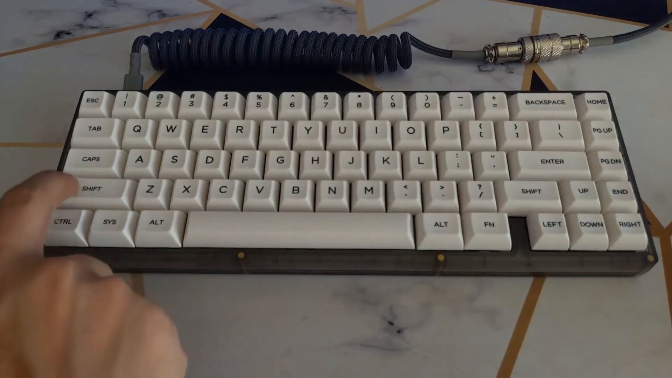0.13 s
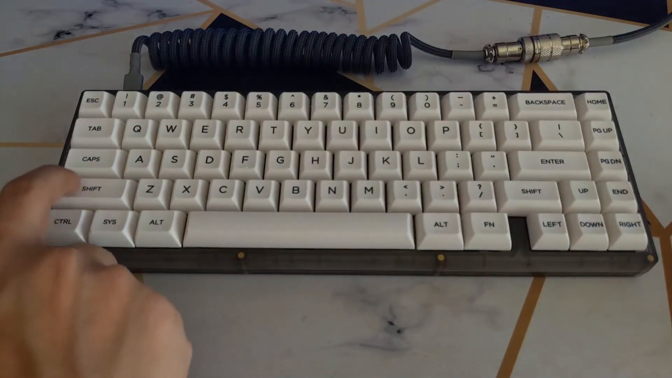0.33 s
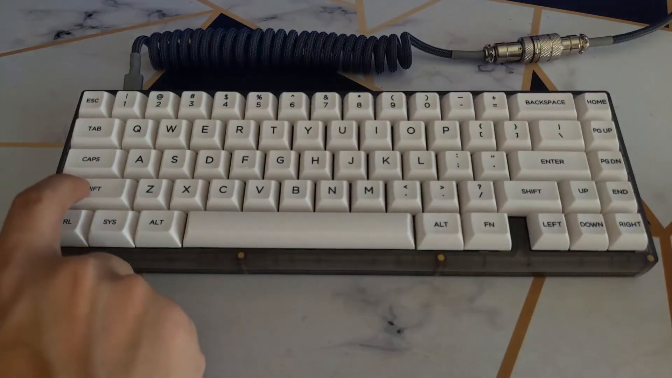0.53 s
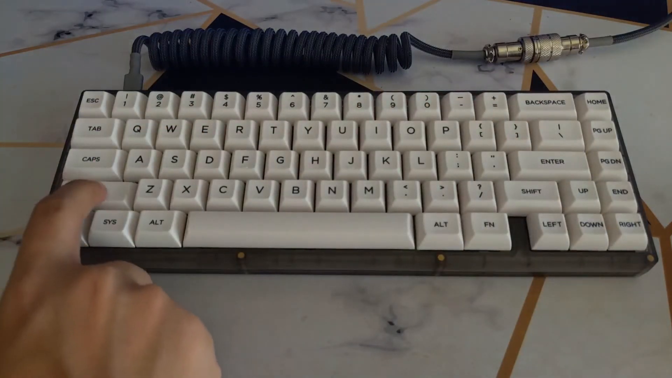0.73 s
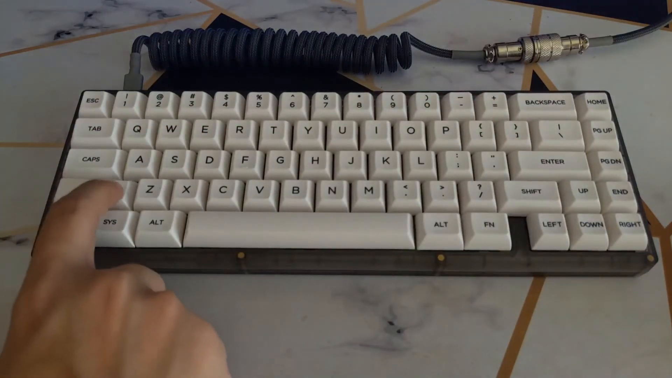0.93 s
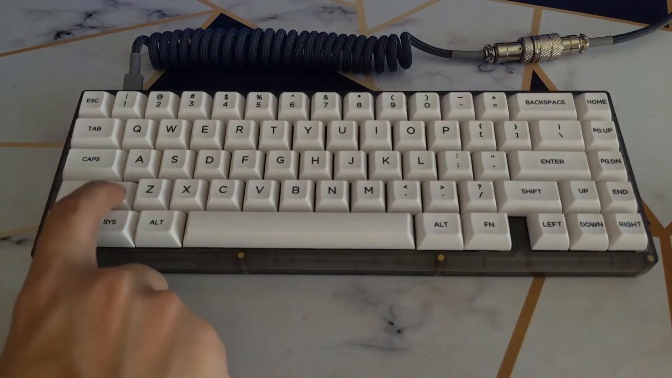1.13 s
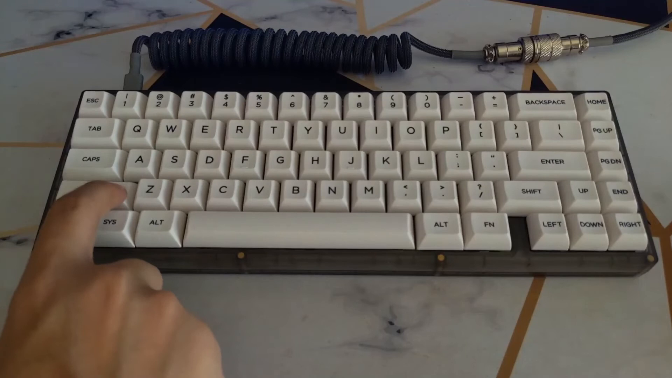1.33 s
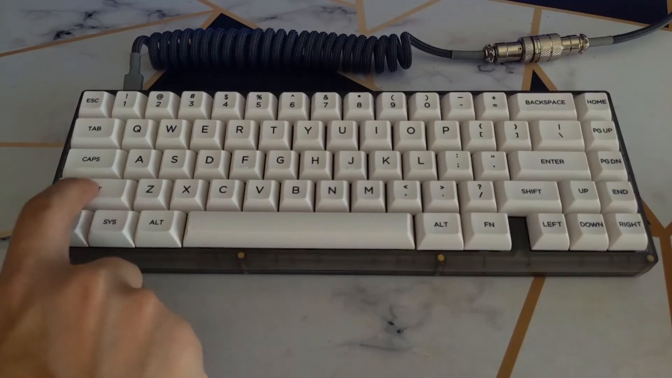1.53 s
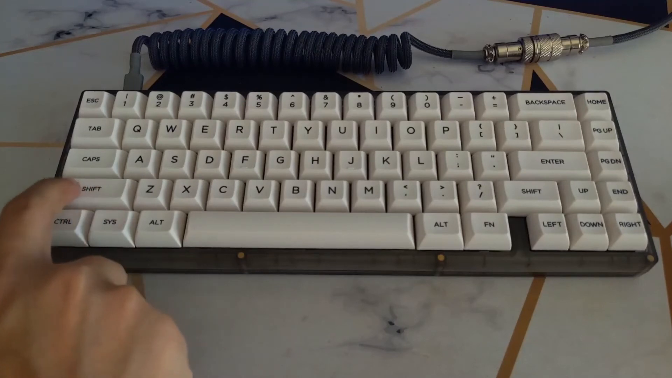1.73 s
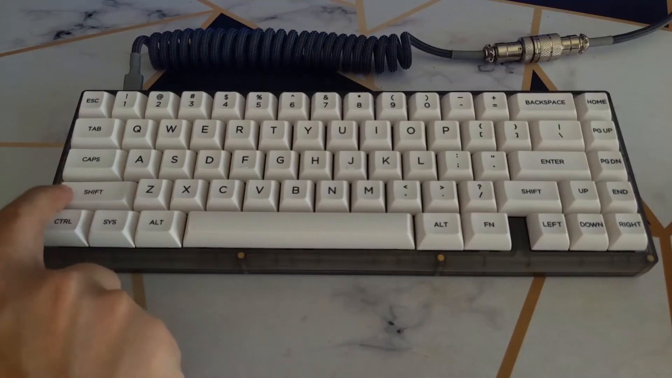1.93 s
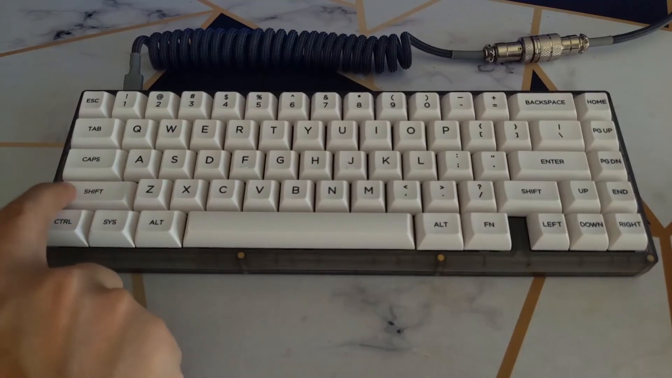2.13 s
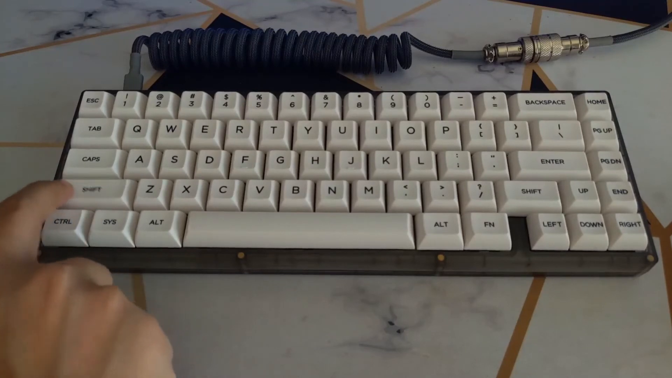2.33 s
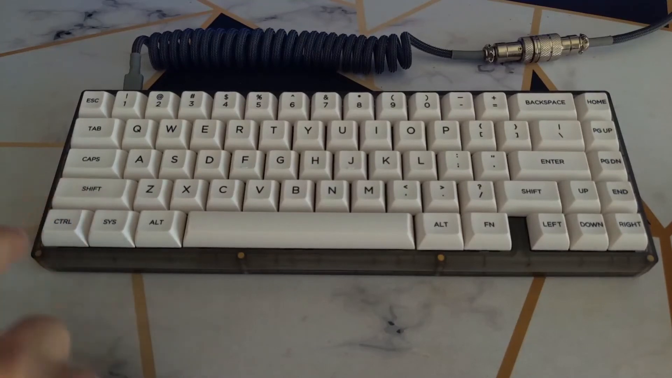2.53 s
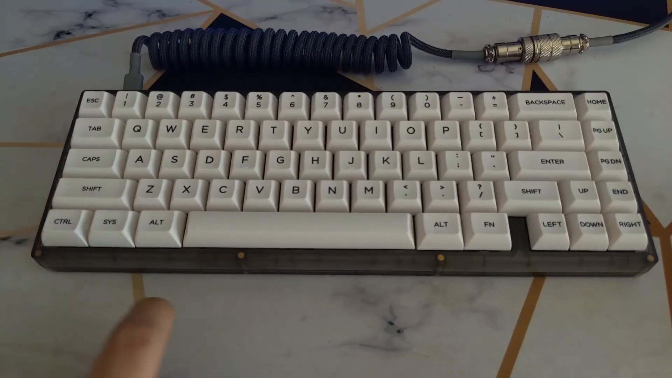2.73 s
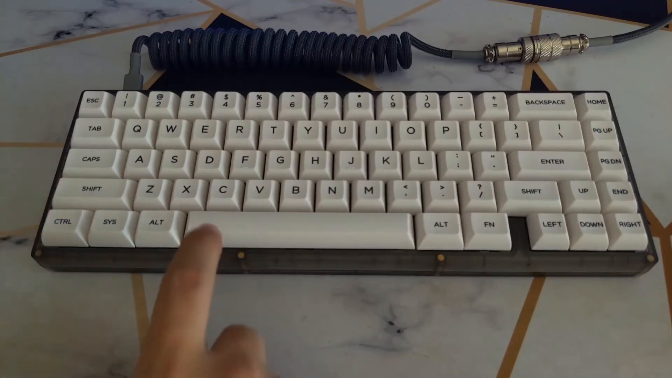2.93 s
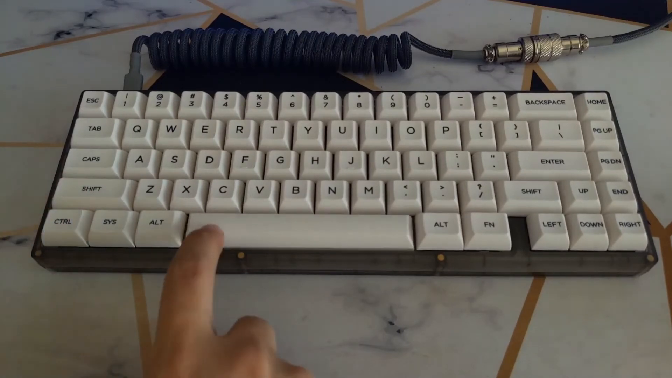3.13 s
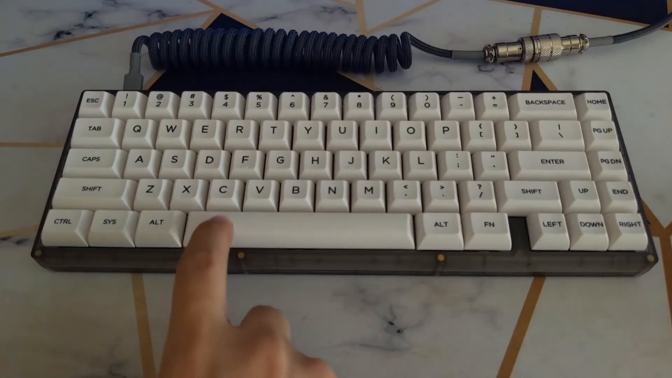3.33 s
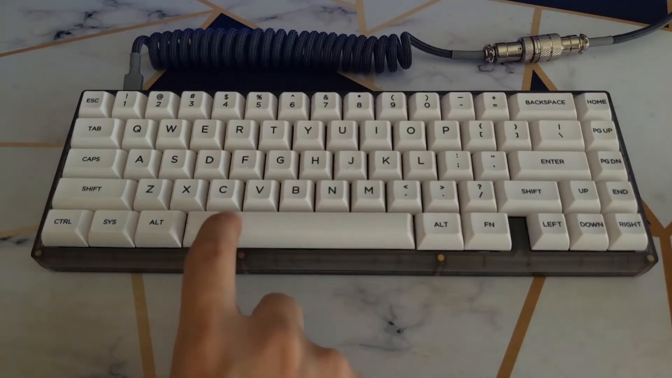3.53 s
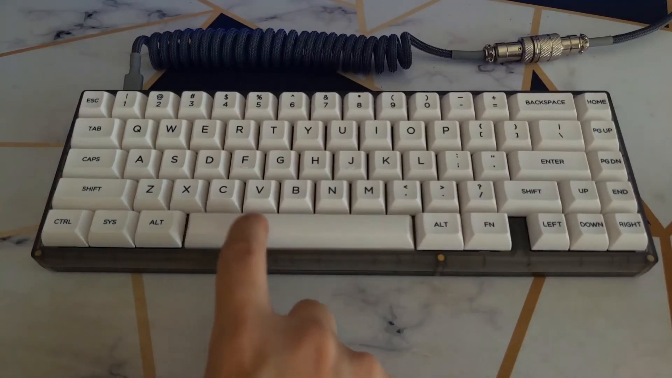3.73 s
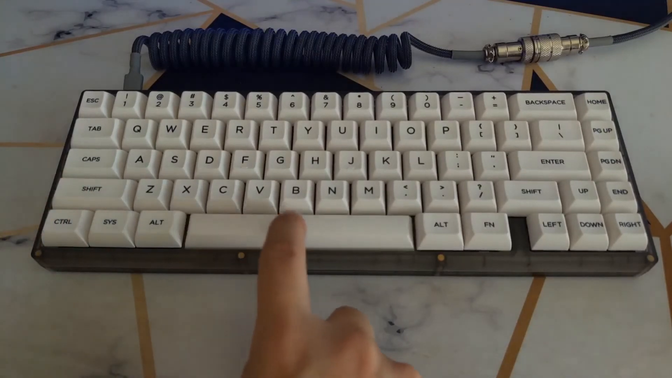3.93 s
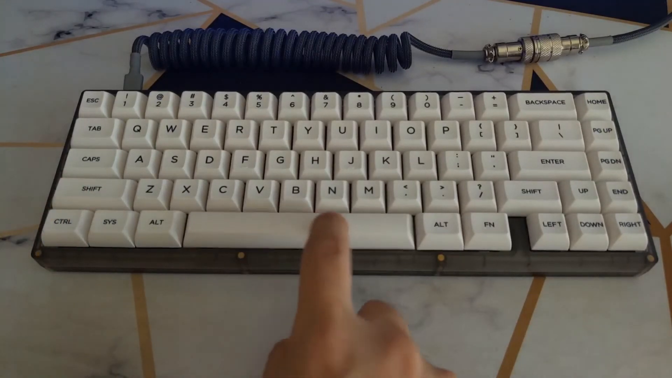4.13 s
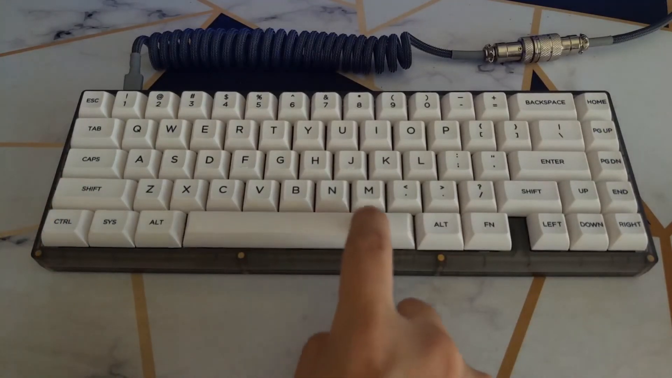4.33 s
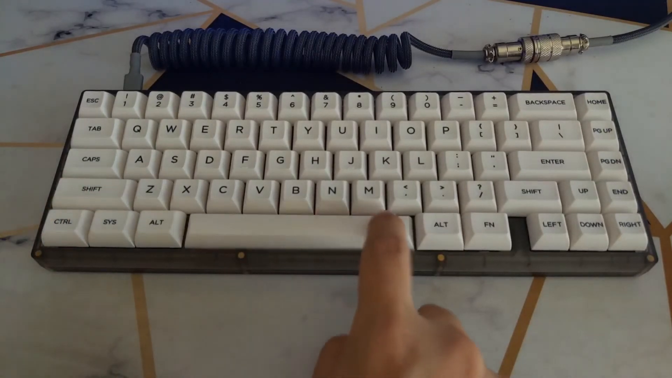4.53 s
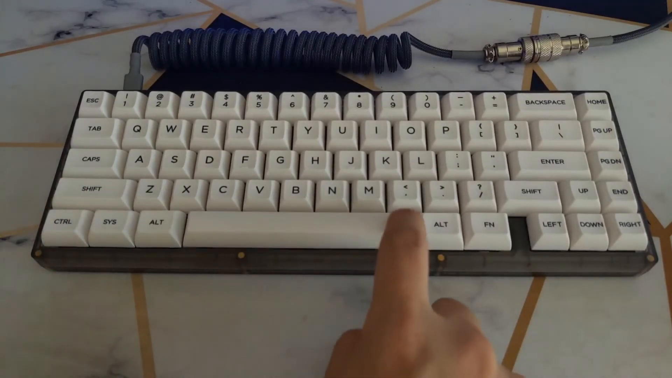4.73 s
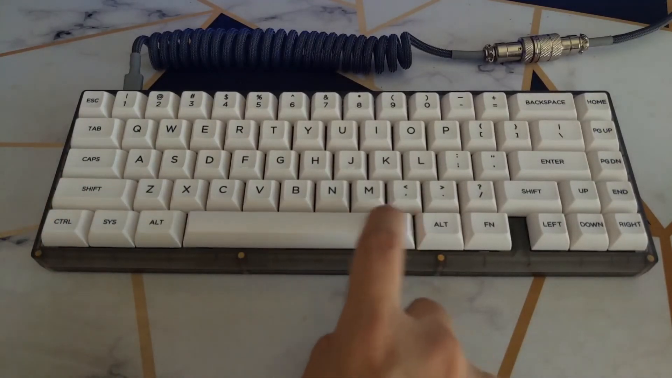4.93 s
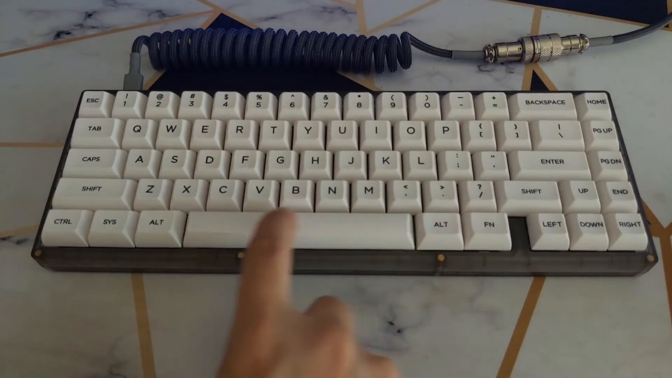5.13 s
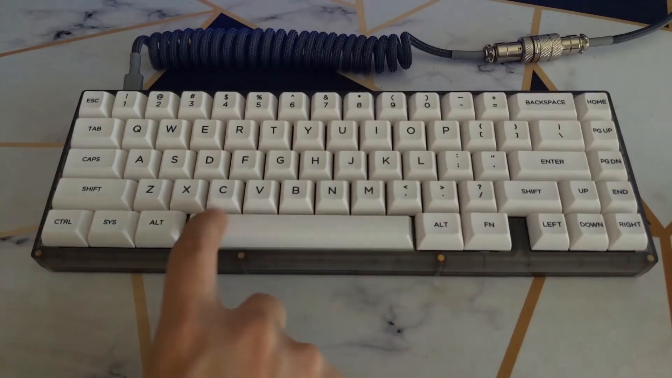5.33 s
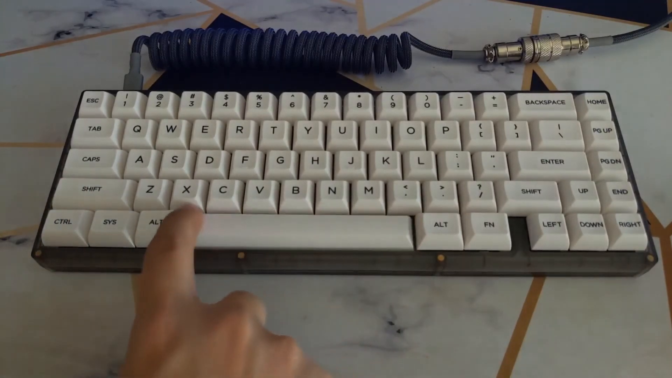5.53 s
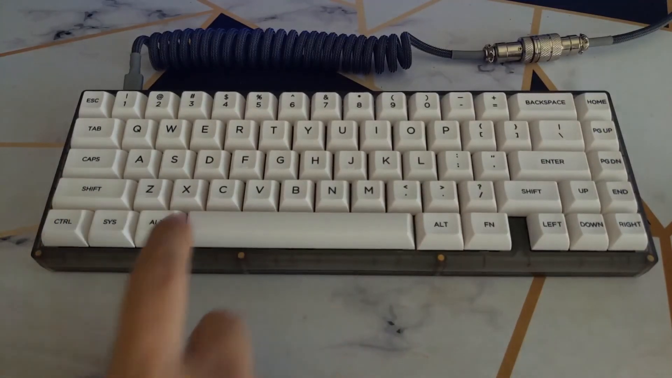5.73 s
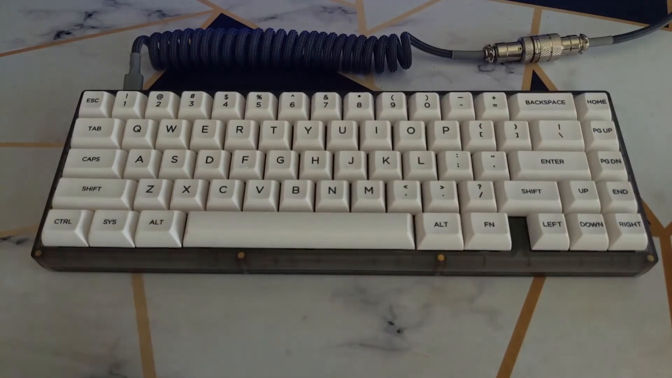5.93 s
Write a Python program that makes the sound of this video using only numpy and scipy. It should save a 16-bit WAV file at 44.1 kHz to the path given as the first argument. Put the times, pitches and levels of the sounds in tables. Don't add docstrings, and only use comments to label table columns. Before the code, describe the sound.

Two bursts of mechanical keyboard tapping, recorded close on the same desk. First a brisk run on a wide key, bright and clicky with loose rattling; then a quiet gap; then a longer run along the space bar, deeper, rounder and thockier, with uneven strength. Short indoor reflections follow the strokes, while the desk gives a very low, subdued boom and sway.

```python
import sys
import numpy as np
from scipy import signal
from scipy.fft import rfft, irfft
from scipy.io import wavfile
from scipy.ndimage import uniform_filter1d

SR = 44100
rng = np.random.default_rng(int(sys.argv[2]) if len(sys.argv) > 2 else 0)


def dump(signal):
    limited = np.clip(np.atleast_2d(signal).T, -1, 1)
    pcm = np.round(limited * 32767).astype(np.int16)
    wavfile.write(sys.argv[1], SR, pcm)


def ratio_of_db(decibels):
    return 10 ** (np.asarray(decibels, float) / 20)


N = 267687
LEAD_SAMPLES = 800


def read(points, hz):
    f_hz, value = np.transpose(points)
    return np.interp(np.log(hz + 1), np.log(f_hz + 1), value)


def add(mix, s, sound):
    part = mix[round(s * SR):][:len(sound)]
    part += sound[:len(part)]


def ring(modes, t, luck, spread_db, rise_s, tilt_db=0):
    hz, width_hz, db = np.transpose(modes)[:, :, None]
    count = len(hz)
    db = db + spread_db * luck[:count, :1] - tilt_db * np.log2(hz / 1800)
    sign = (-1.) ** np.arange(count)[:, None]
    mode_hz = hz * (1 + .011 * luck[:count, 1, None])
    decay = np.exp(-np.pi * width_hz * t)
    waves = sign * ratio_of_db(db) * decay * np.sin(2 * np.pi * mode_hz * t)
    return waves.sum(0) * (1 - np.exp(-(t / rise_s) ** 2))


def stroke(peak_db, treble_db, low_db, thud_db, rattle_db, body, tick, knock, luck):
    t = np.arange(LEAD_SAMPLES) / SR
    heights = luck[:24]
    scrape, chatter = luck[100:100 + LEAD_SAMPLES, :2].T
    gap_luck, size_luck = luck[30:34].T[:2]

    blows = np.zeros(2 * LEAD_SAMPLES)
    blows[:LEAD_SAMPLES] = ratio_of_db(-39.0) * scrape * (t / t[-1]) ** 4.5
    blows[LEAD_SAMPLES] = 1
    lone_blow = blows * (np.arange(2 * LEAD_SAMPLES) == LEAD_SAMPLES)
    gaps_s = np.array([.0014, .0029, .0055, .009]) * np.exp(.25 * gap_luck)
    bounce_db = rattle_db - 5.0 * np.arange(len(gaps_s)) + 3.9 * size_luck
    bounce_at = LEAD_SAMPLES + np.minimum(gaps_s * SR, LEAD_SAMPLES - 1).astype(int)
    blows[bounce_at] += ratio_of_db(bounce_db) * np.sign(gap_luck * size_luck)

    contact = np.exp(-((t - .0004) / .00006) ** 2)
    edge = np.exp(-((t - .0005) / .000013) ** 2)
    gritty_edge = edge + 0.11 * chatter * (t / 0.0016) * np.exp(-t / 0.0018)
    dullness_db = 0.66 * (-19.5 - treble_db)

    out = []
    for train, grit, blur in ((blows, gritty_edge, 1), (lone_blow, edge, 1.6)):
        body_ring = ring(np.multiply(body, [1, blur, 1]), t, heights, 1.0, 0.00025, low_db)
        tick_ring = ring(np.multiply(tick, [1, blur, 1]), t, heights[::-1], 6.1, 0.00023, dullness_db)
        thock = signal.fftconvolve(np.convolve(body_ring, contact), train)
        click = signal.fftconvolve(np.convolve(tick_ring, np.gradient(grit)), train)
        thock /= abs(thock).max()
        click /= abs(click).max()
        out.append(ratio_of_db(peak_db - 2.0) * (thock + ratio_of_db(treble_db) * click))

    thump = ratio_of_db(thud_db + 7.5) * ring(knock, np.arange(2 * LEAD_SAMPLES) / SR, heights[::-2], 1.4, 0.0051)
    fade = np.cos(np.linspace(0, np.pi / 2, 2 * LEAD_SAMPLES))
    add(out[0], LEAD_SAMPLES / SR, thump * fade)
    return out


def keys():
    # [t/s, blow peak/dB, treble share/dB, rattle/dB]
    wide_strokes = [(.205, -25.5, -18.5, -8), (.284, -30, -17.5, -1.5), (.381, -23, -13, -11.5),
                    (.457, -30.5, -21.5, -1), (.545, -27.5, -21.5, -8), (.609, -26.5, -16.5, 12),
                    (.705, -28.5, -19.5, -14), (.775, -34.5, -17.5, 0), (.934, -26, -21, -9),
                    (1.023, -35.5, -28.5, 14), (1.094, -23, -15.5, -19), (1.194, -36.5, -53.5, -9),
                    (1.261, -21.5, -17, -16), (1.344, -30.5, -6.5, 6), (1.418, -22.5, -14.5, -14.5),
                    (1.504, -30, -23, -1), (1.59, -27.5, -17.5, -13), (1.672, -30, -22.5, -2.5),
                    (1.744, -22.5, -15, -11), (1.828, -28, -27, 6), (1.911, -23.5, -23, -7),
                    (1.991, -24, -11.5, -7.5), (2.082, -22, -18, -12), (2.326, -30.5, -19, -3)]
    bar_strokes = [(3.134, -42, -62.5, -2.5), (3.272, -31.5, -24.5, -34), (3.325, -30.5, -18, -12),
                   (3.421, -25.5, -13.5, -17.5), (3.5, -33.5, -18, -17), (3.57, -26, -14.5, -15),
                   (3.653, -34, -14.5, -10), (3.729, -27.5, -16.5, -8.5), (3.816, -34, -19, -13),
                   (3.89, -27.5, -19, -15.5), (3.998, -34, -32, -41), (4.059, -27.5, -21, -12),
                   (4.129, -32, -23.5, -10), (4.225, -27.5, -15.5, -23), (4.294, -33, -28.5, -6),
                   (4.402, -33, -62, -23.5), (4.546, -28, -21, -12.5), (4.627, -25, -15.5, -9.5),
                   (4.716, -30, -29.5, -32), (4.791, -26, -15, -13), (4.888, -28.5, -29.5, -26),
                   (4.967, -25, -12.5, -12), (5.056, -33.5, -28, -5), (5.146, -28, -17.5, -9),
                   (5.243, -29, -23, -22), (5.318, -23, -14, -17.5), (5.408, -32.5, -22.5, -8),
                   (5.48, -23.5, -13.5, -19), (5.562, -28.5, -18, -7)]
    wide_ticks = [(.173, -41.5, -34, -7), (.3535, -36, -36, -21), (.507, -41, -41, -13),
                  (.594, -39, -35.5, 12), (1.066, -52.5, -30.5, -12), (1.2344, -49.5, -30, -23),
                  (1.49, -46, -34.5, -4), (1.5439, -41, -36, -14.5), (1.72, -36.5, -26.5, -8),
                  (1.8897, -37, -34, 12), (2.0712, -35, -29, -6.5)]
    bar_ticks = [(4.5134, -69, -33, 5), (4.6043, -49, -38.5, -7.5), (4.692, -55, -36, -11),
                 (4.761, -48, -28.5, -8.5), (4.947, -59.5, -30, -5), (5.3014, -46, -29, -11.5),
                 (5.459, -43.5, -33, -17), (5.571, -43, -21.5, -4), (5.648, -61, -41, -18)]
    # [f/Hz, width/Hz, level/dB]
    wide_down_body = [(896, 150, -13.5), (1448, 240, -5.5), (1970, 230, 2.5), (2497, 210, 1.5),
                      (3170, 136, 0.5), (4065, 660, 1.8), (4850, 280, -3.5)]
    wide_up_body = [(893, 90, -17.5), (1453, 110, -13.5), (1847, 87, -8), (2137, 170, -2), (2487, 200, 4.5),
                    (3223, 177, 2.35), (4240, 420, -9.5), (4905, 140, -12)]
    wide_loose_body = [(1700, 350, -7.5), (1970, 300, 2.5), (2490, 380, 3.5), (2870, 320, 3),
                       (3000, 260, -13.5), (4600, 250, -16.5)]
    wide_tick = [(4100, 670, 8), (5020, 1200, 5.5), (5600, 430, 0), (6900, 350, -0.5), (7740, 660, -5.5),
                 (8820, 510, -3), (9820, 450, -10.5), (10730, 900, -8.5), (12850, 910, -6)]
    bar_down_body = [(873, 97, -16), (1120, 130.4, -5), (1372, 184, 0.5), (1801, 128, -1), (2562, 210, 1),
                     (3537, 274, 1), (4250, 360, -13.5), (4510, 71, -17)]
    bar_up_body = [(864, 160, -22.5), (1109, 191, -6), (1356, 170, -3.5), (1800, 124, 0.5),
                   (2528, 213, 3.5), (3410, 140, -10.5), (4300, 346, -21.5)]
    bar_loose_body = [(1794, 250, 0.5), (2500, 300, -5.5), (3420, 510, -2.5), (4500, 300, -15.5)]
    bar_tick = [(4310, 380, 5.5), (5290, 370, -19), (5834, 353, 5), (8220, 460, 7), (8216, 540, 4.5),
                (10100, 480, -2), (11100, 210, -35), (12780, 520, -11.5), (15100, 380, -27.5)]
    # [f/Hz, width/Hz, level/dB]
    wide_knock = [(232, 21, -19.5), (378, 28, 1), (485.7, 42, -1)]
    bar_knock = [(212, 63, 2.5), (271.6, 50, 4), (349, 47, -11)]
    # [low-mode share/dB, slope/(dB/dB), desk thud/dB, slope/(dB/dB), leg jolt/dB]
    wide_down_law = (2.2, 0.23, -70, 1.05, -44.5)
    wide_up_law = (2.5, -0.23, -65, 0.56, -53)
    bar_down_law = (2.5, -0.01, -56, 1, -41.5)
    bar_up_law = (4.5, -0.12, -56.5, 0.42, -47.5)
    tick_law = (-2, -0.32, -86, -0.6, -61)
    # [t/s, jolt/dB]
    hand_lands = [
        (2.97, -57),
        (3.128, -47),
    ]

    kinds = (
        (wide_strokes[::2], wide_down_law, wide_down_body, wide_tick, wide_knock),
        (wide_strokes[1::2], wide_up_law, wide_up_body, wide_tick, wide_knock),
        (bar_strokes[1::2], bar_down_law, bar_down_body, bar_tick, bar_knock),
        (bar_strokes[::2], bar_up_law, bar_up_body, bar_tick, bar_knock),
        (wide_ticks, tick_law, wide_loose_body, wide_tick, wide_knock),
        (bar_ticks, tick_law, bar_loose_body, bar_tick, bar_knock))
    usual_blow_db, jolt_per_db = -28, 0.87
    near, far, pushes, jolts = np.zeros((4, N))
    t = np.arange(1000) / SR
    cushion = np.exp(-((t - .001) / 0.00042) ** 2)
    for rows, law, body, tick, knock in kinds:
        low_db, low_slope, thud_db, thud_slope, jolt_db = law
        lucks = rng.standard_normal((len(rows), len(t), 3))
        for (s, peak_db, treble_db, rattle_db), luck in zip(rows, lucks):
            firm_db = peak_db - usual_blow_db
            low = low_db + low_slope * firm_db
            thud = thud_db + thud_slope * firm_db
            direct, spread = stroke(peak_db, treble_db, low, thud, rattle_db, body, tick, knock, luck)
            add(near, s - LEAD_SAMPLES / SR, direct)
            add(far, s - LEAD_SAMPLES / SR, spread)
            shove = luck[:, -1] * np.exp(-t / 0.0043)
            add(pushes, s, ratio_of_db(thud - 54.5) * np.convolve(shove, cushion))
            jolts[round(s * SR)] = ratio_of_db(jolt_db + jolt_per_db * firm_db)
    for s, jolt_db in hand_lands:
        add(jolts, s, ratio_of_db(np.array([jolt_db])))
    return near, far, pushes, jolts


def room(x):
    # [delay/s, level/dB]
    echoes = [(.0058, -23), (.0103, -23.5), (.0139, -25), (.021, -30.5)]
    # [f/Hz, t60/s]
    room_t60 = [(200, 0.23), (700, 0.47), (2000, 0.2), (5000, 0.31), (12000, 0.48)]
    tail_db, turn_hz, onset_s = -8.5, 2.65, 0.0037
    out = np.zeros(N)
    for delay_s, db in echoes:
        add(out, delay_s, ratio_of_db(db) * x)
    turn = 2 * np.pi * turn_hz * np.arange(N) / SR
    for k in range(3):
        hz, t, z = signal.stft(rng.standard_normal(SR // 2), SR, nperseg=128)
        decay = ratio_of_db(-60 * t / read(room_t60, hz)[:, None])
        tail = signal.istft(z * decay, SR, nperseg=128)[1]
        tail *= np.clip(np.arange(len(tail)) / SR / onset_s, 0, 1)
        feed = x * np.cos(turn + k * np.pi / 3) * np.sqrt(2 / 3)
        out += ratio_of_db(tail_db) * signal.oaconvolve(feed, tail / np.linalg.norm(tail))[:N]
    return out


def desk_top(pushes):
    # [f/Hz, level/dB, t60/s]
    desk_modes = [(95.33, -1, 1), (126.8, 2.5, 0.34), (158.7, -11, .3), (224.1, 0.5, 0.28),
                  (248, -6.5, 0.033), (286.3, -1, 0.082), (315, -10.5, .1), (354.5, -1.5, 0.12),
                  (401.4, -13, 0.1), (457, -12, 0.3), (574, -17, 0.24)]
    t = np.arange(SR) / SR
    boom = sum(ratio_of_db(db - 60 * t / t60_s) * np.sin(2 * np.pi * hz * t) for hz, db, t60_s in desk_modes)
    return ratio_of_db(1.5) * signal.oaconvolve(pushes, boom)[:N]


def desk_legs(jolts):
    # [t/s, f/Hz, level/dB]
    sway_track = [(0.0, 23.3, -80), (0.22, 24.8, -46.5), (0.32, 25.1, -54), (0.78, 25.14, -40),
                  (1.08, 24.8, -50), (1.23, 24.74, -45.5), (1.84, 24.77, -55), (2.04, 26.55, -49),
                  (2.13, 25.05, -44), (2.91, 24.54, -56), (3.11, 26.32, -58), (3.5, 26.1, -41),
                  (3.75, 26.24, -53), (3.87, 23.72, -46), (4.18, 23.83, -35), (4.48, 23.4, -33),
                  (5.93, 23.43, -46.5), (6.07, 23.02, -51.5)]
    # [f/Hz, width/Hz, level/dB]
    shudder = [(30.3, 3.7, -4.4), (35.1, 3.4, 0.5), (17, 6, -10.5), (7.6, 1.2, -13)]
    # [f/Hz, width/Hz, level/dB]
    rocking = [(48.39, 0.83, -8), (57, 2.2, -10), (64, 3.3, -18)]
    first_touch_s, wake_s = 0.17, 0.033
    shudder_rise_s, rocking_rise_s = 0.021, .015
    t = np.arange(N) / SR
    s, *columns = np.transpose(sway_track)
    hz, sway_db = (np.interp(t, s, c) for c in columns)
    started = np.clip((t - first_touch_s) / wake_s, .3, 1)
    sway = started * np.sqrt(2) * ratio_of_db(sway_db) * np.sin(2 * np.pi * np.cumsum(hz) / SR)
    ring_t = np.arange(2 * SR) / SR
    even = np.zeros((len(shudder), 2))
    rings = ring(shudder, ring_t, even, 0, shudder_rise_s) + ring(rocking, ring_t, even, 0, rocking_rise_s)
    return sway + signal.oaconvolve(jolts, rings)[:N]


def coloured(points):
    shape = ratio_of_db(read(points, np.fft.rfftfreq(N, 1 / SR)))
    x = irfft(rfft(rng.standard_normal(N)) * shape, N)
    return x / (np.sqrt(uniform_filter1d(x ** 2, size=6000)) + 1e-9)


def murmur(jolts):
    # [f/Hz, level/dB per Hz]
    murmur_colour = [(60, -9), (95, 4), (155, -7.5), (220, -1.5), (320, -9.5), (460, -20.5), (650, -32),
                     (1200, -64)]
    fed_db, t60_s, rise_s, still_db = -26, 2.6, 0.051, -91.5
    t = np.arange(N) / SR
    response = ratio_of_db(fed_db - 60 * t / t60_s) ** 2 * (1 - np.exp(-t / rise_s))
    power = signal.fftconvolve(np.square(jolts), response)[:N]
    level = np.sqrt(abs(power) + ratio_of_db(still_db) ** 2)
    z = signal.stft(coloured(murmur_colour), SR, nperseg=2048)[2]
    patches = uniform_filter1d(rng.standard_normal(z.shape), size=3, axis=0)
    patches = uniform_filter1d(patches, size=5, axis=1)
    patch_gain = ratio_of_db(5.7 * patches / patches.std() - 3)
    return level * signal.istft(z * patch_gain, SR, nperseg=2048)[1][:N]


def noise_gate(dry):
    hz, t, z = signal.stft(dry, SR, nperseg=1024, noverlap=768, boundary="even")
    band, block = np.arange(len(hz)) // 12, np.arange(len(t)) // 4
    power = uniform_filter1d(abs(z) ** 2, size=12, axis=1)
    power = uniform_filter1d(power, size=4, axis=2)
    band_centre = np.minimum(12 * band + 6, len(hz) - 1)
    block_centre = np.minimum(4 * block + 2, len(t) - 1)
    held = power[:, band_centre][:, :, block_centre]
    mood = rng.standard_normal((block[-1] + 1, band[-1] + 1)).T
    mood = uniform_filter1d(mood, size=3, axis=1)[band][:, block]
    mood_db = 2.2 * mood * (hz > 3000)[:, None]
    threshold = [(300, -135), (1000, -112), (4000, -112), (8000, -108), (14000, -109)]  # f/Hz, level/dB
    over_db = 10 * np.log10(held + 1e-20) - mood_db - read(threshold, hz)[:, None]
    opening = 1 / (1 + np.exp(-np.clip(over_db / 0.36, -30, 30)))
    gain = np.maximum(opening, ratio_of_db(-32.5))
    gain[:, hz < 700] = 1
    return signal.istft(z * gain, SR, nperseg=1024, noverlap=768)[1][:, :N]


def electronics_hiss():
    # [f/Hz, level/dB per Hz]
    hiss_colour = [(590, -32.5), (1000, -4), (7270, -3), (7880, -1.5), (10300, -4), (12900, -3),
                   (15500, -2.5)]
    wake = np.clip(np.arange(N) / SR / 0.26, .3, 1) ** 3
    return wake * ratio_of_db(-97) * coloured(hiss_colour)


def scene():
    near, far, pushes, jolts = keys()
    return (near + room(far) + desk_top(pushes) + desk_legs(jolts) + murmur(jolts))[None]


def top_cut(x):
    return signal.sosfilt(signal.butter(12, 15640, fs=SR, output="sos"), x)


def record(dry):
    gated = noise_gate(dry)
    return top_cut(gated + electronics_hiss())


dry = scene()
out = record(dry)
dump(out)
```